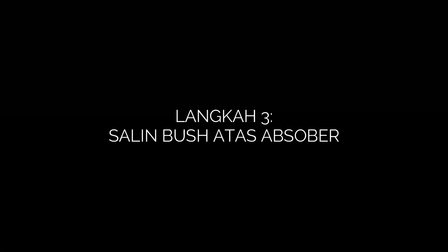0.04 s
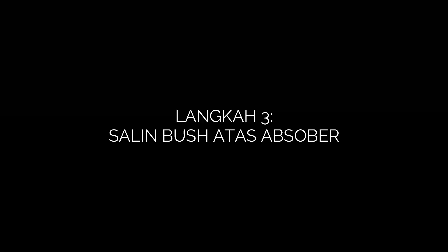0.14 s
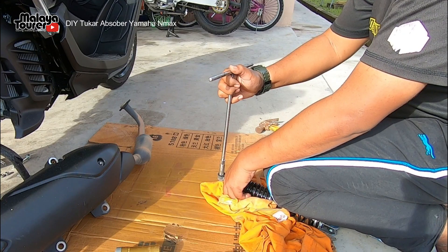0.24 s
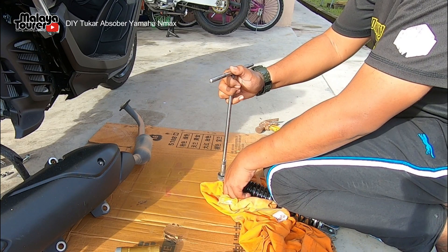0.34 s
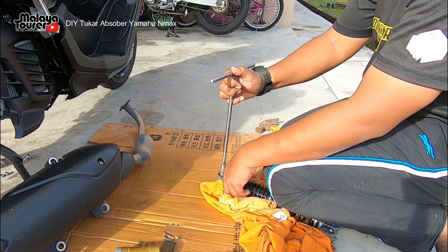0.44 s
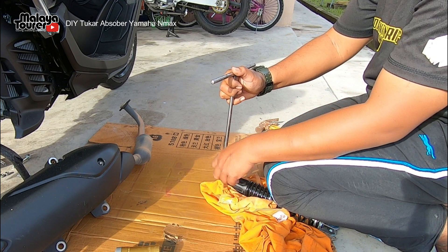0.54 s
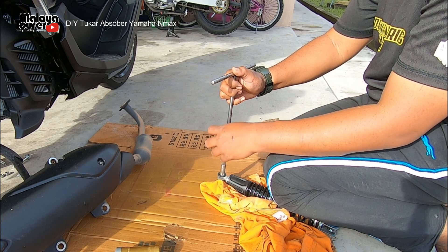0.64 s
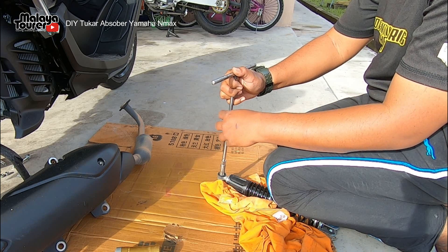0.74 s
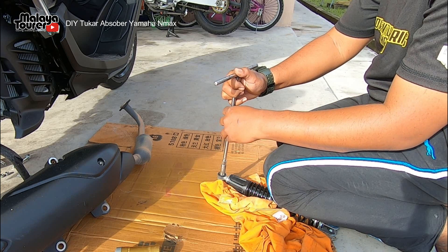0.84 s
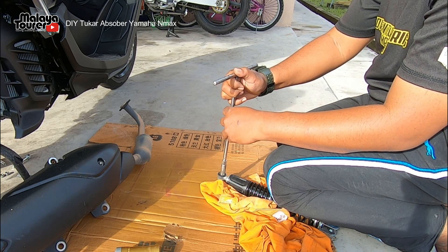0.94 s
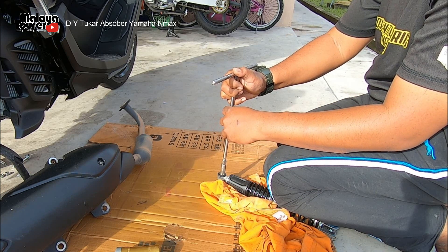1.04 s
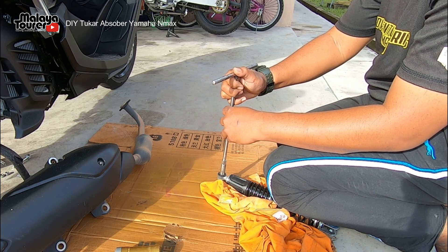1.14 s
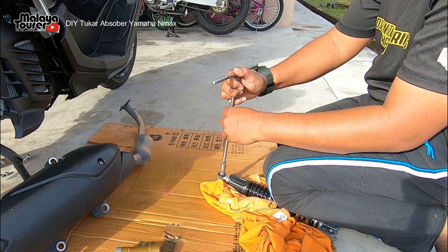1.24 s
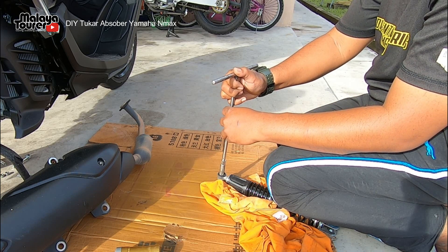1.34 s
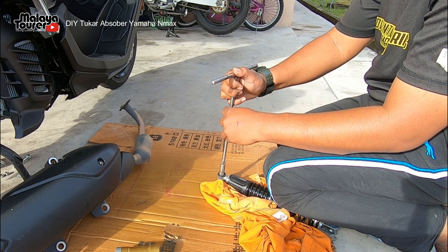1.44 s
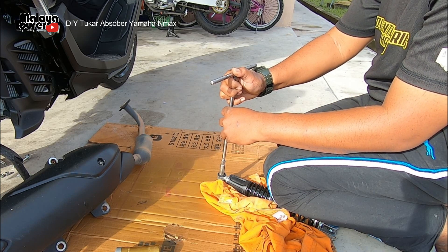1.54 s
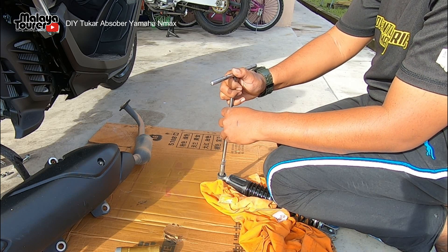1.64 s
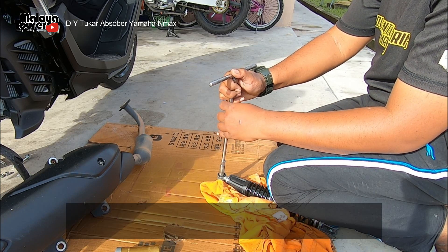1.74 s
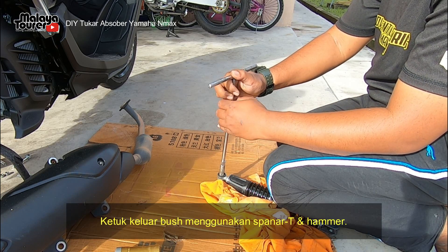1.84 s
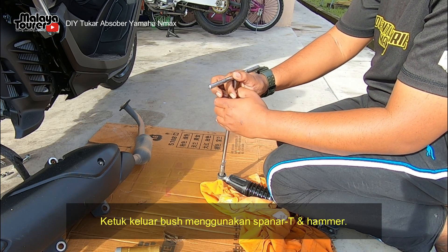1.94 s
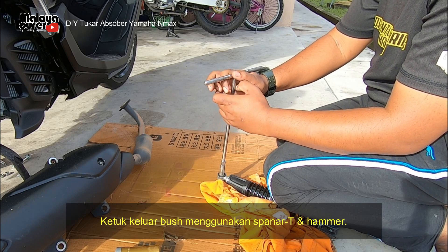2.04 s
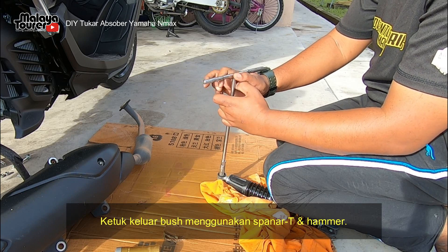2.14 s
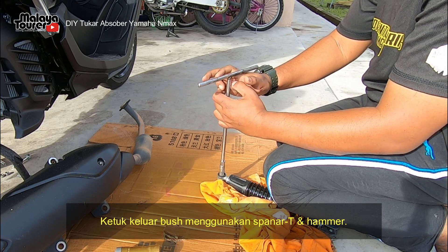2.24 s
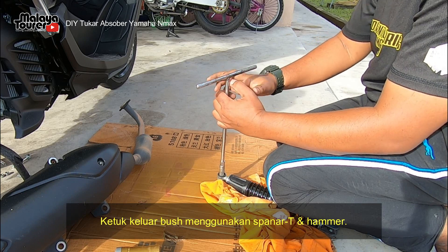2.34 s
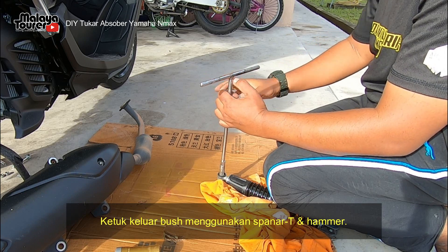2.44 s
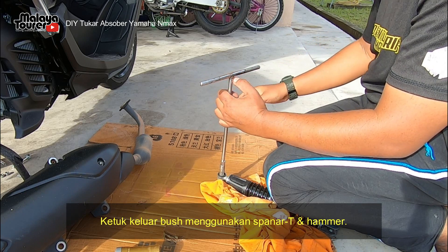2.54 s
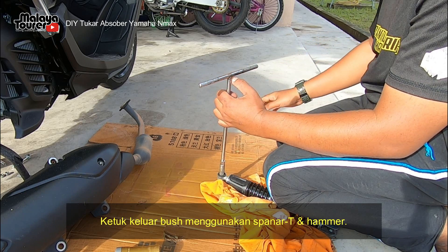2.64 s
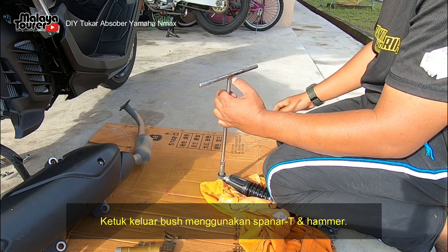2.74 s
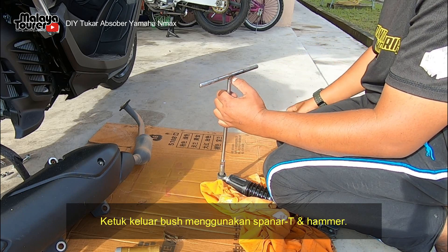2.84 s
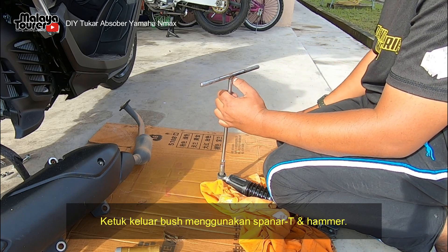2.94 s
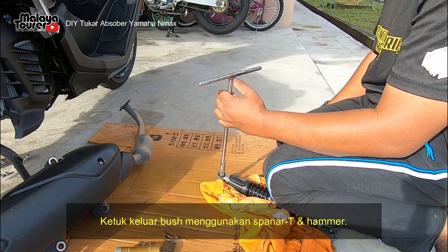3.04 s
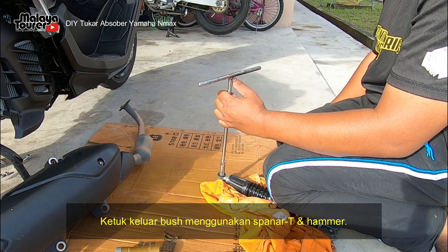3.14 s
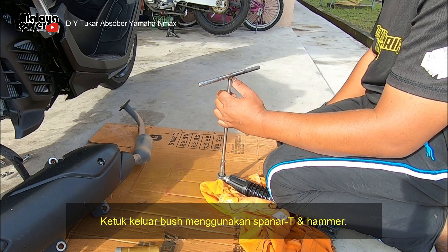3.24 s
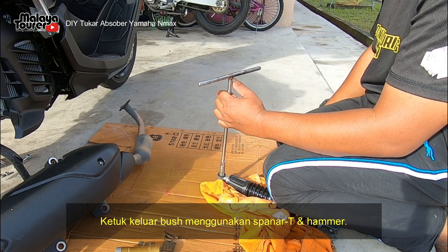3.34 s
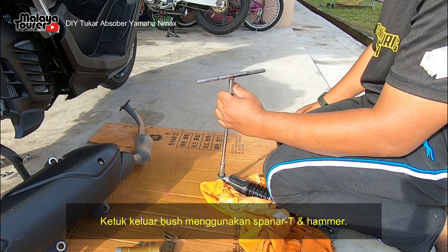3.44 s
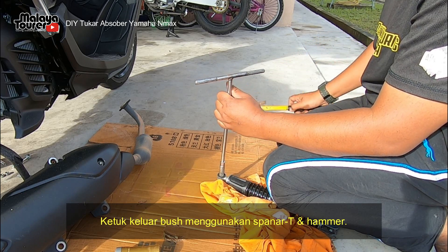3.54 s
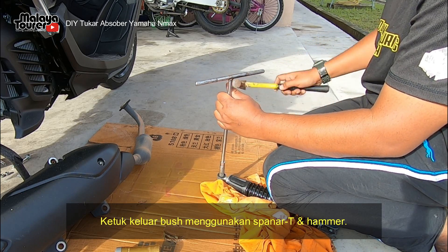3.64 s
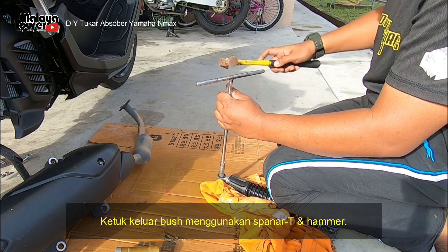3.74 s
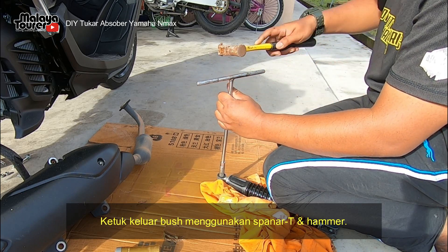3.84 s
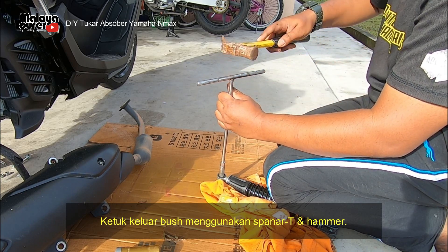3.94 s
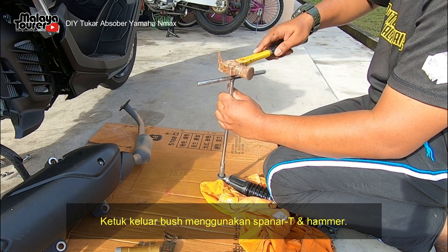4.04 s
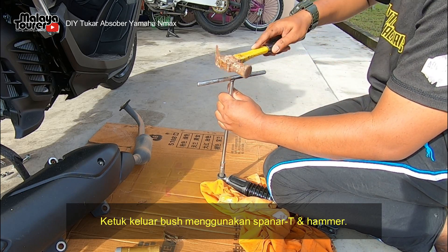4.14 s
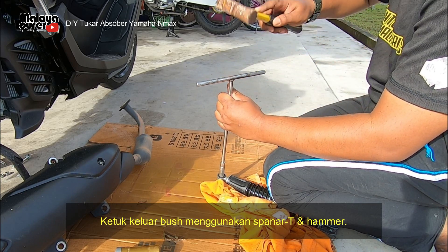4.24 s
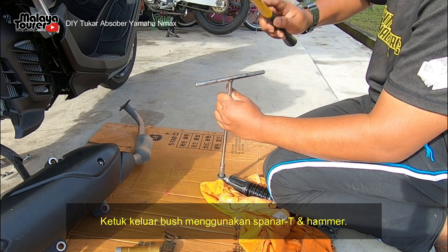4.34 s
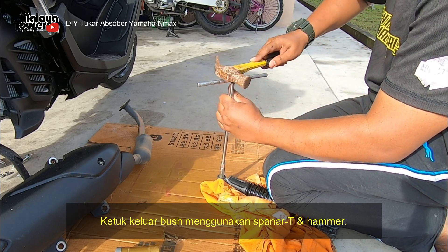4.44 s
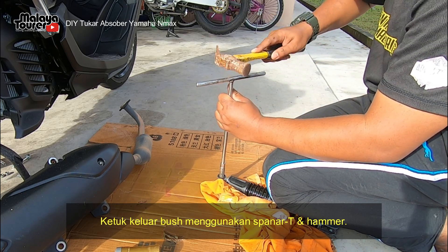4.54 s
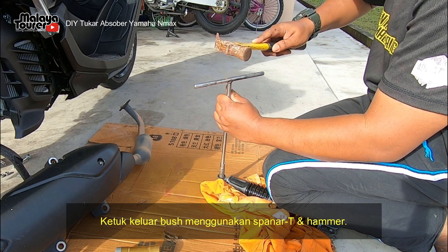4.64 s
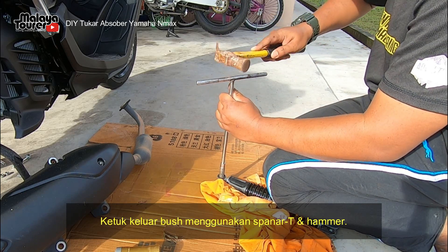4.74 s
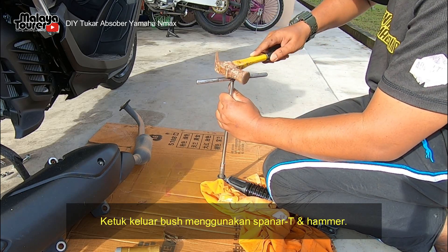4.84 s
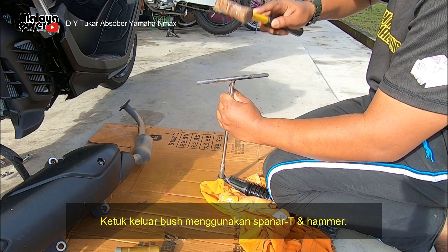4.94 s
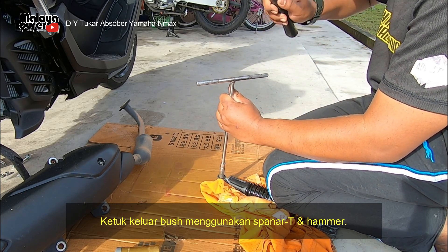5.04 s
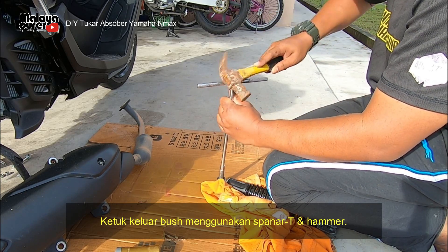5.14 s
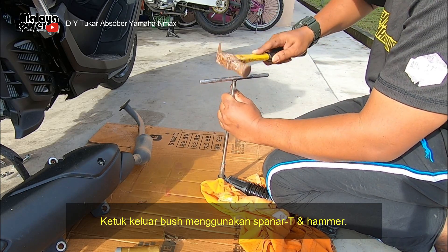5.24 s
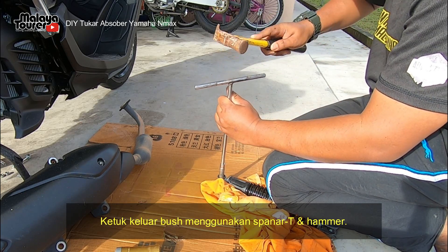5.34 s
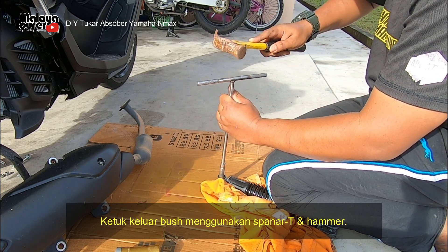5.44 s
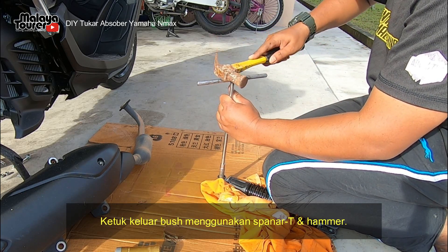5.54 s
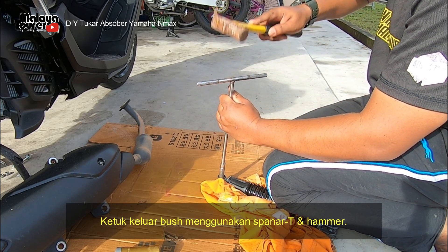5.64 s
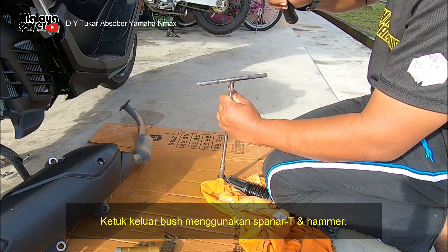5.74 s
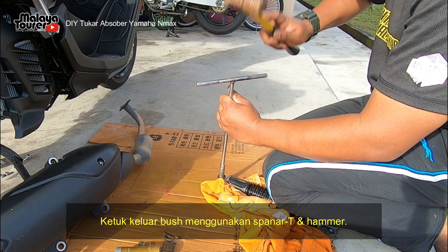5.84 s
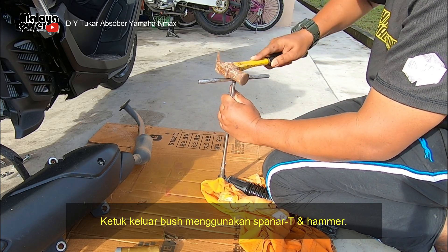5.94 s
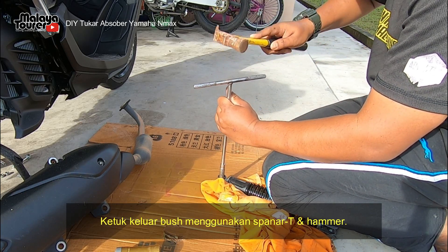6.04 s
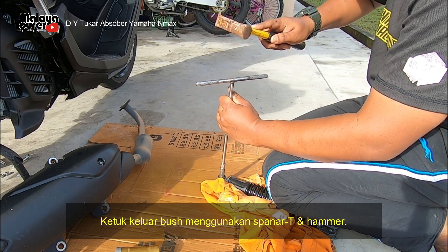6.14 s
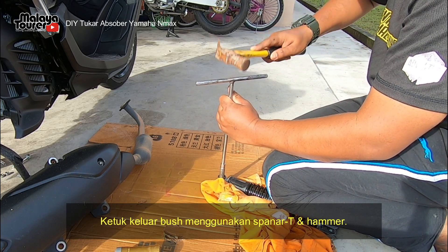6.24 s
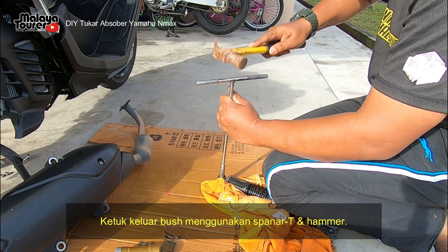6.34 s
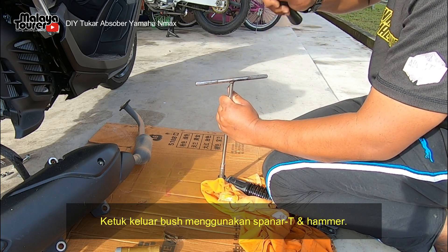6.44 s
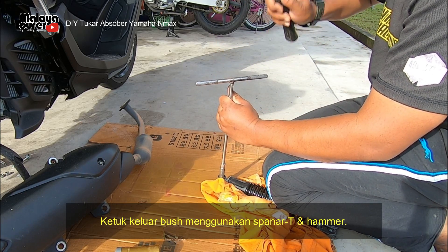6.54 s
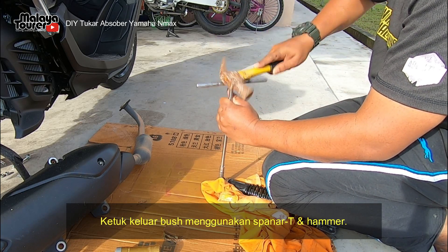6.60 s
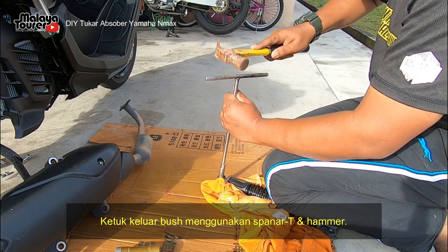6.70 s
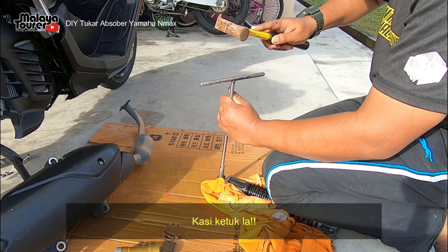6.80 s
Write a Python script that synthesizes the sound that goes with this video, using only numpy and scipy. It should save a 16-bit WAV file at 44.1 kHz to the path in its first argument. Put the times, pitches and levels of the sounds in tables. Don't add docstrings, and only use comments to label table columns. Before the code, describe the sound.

After a quiet outdoor stretch of traffic rumble and insects, a hammer strikes a hand-held steel bar eight times, sharp clanks alternating dull and bright.

```python
import sys
import numpy as np
from scipy import signal
from scipy.fft import rfft, irfft, next_fast_len
from scipy.io import wavfile
from scipy.ndimage import uniform_filter1d

SR = 44100
rng = np.random.default_rng(int(sys.argv[2]) if len(sys.argv) > 2 else 0)


def convert_level_to_amplitude(level_db):
    exponent = np.asarray(level_db, float) / 20
    return 10 ** exponent


def inscribe(sig):
    pcm = np.round(np.clip(np.atleast_2d(sig).T, -1, 1) * 32767)
    wavfile.write(sys.argv[1], SR, pcm.astype(np.int16))


N = 302967

# (time [s], level [dB])
TRAFFIC = [
    (.2, 3),
    (1.1, -1),
    (2.2, -1),
    (3.2, .5),
    (4.2, 1.5),
]
# (frequency [Hz], density [dB per Hz])
RUMBLE_SPECTRUM = [(12, -40), (20, -33), (57, -0.5), (76, 0.5), (119, 0), (145, -4), (182, -0.5),
                   (258, -13), (371, -20.5), (400, -23), (520, -28.5), (880, -120)]
# (frequency [Hz], density [dB per Hz])
AIR_SPECTRUM = [(150, -70), (250, -0.5), (371, -10.5), (404, -10), (569, -10.5), (829, -13), (1270, -18),
                (2090, -20.5), (5100, -28), (6370, -30.5), (7690, -27.5), (8380, -48.5), (9450, -31.5),
                (11800, -53.5), (15000, -52)]
# (frequency [Hz], width [Hz], level over air [dB])
CHORUS = [(6355, 250, -15.5), (9130, 750, -21)]
# (middle [s], length [s], pitch [Hz], level over air [dB])
BOUTS = [
    (.2, .1, 7670, -19),
    (.8, .3, 7600, -18),
    (1.25, .25, 7850, -20),
    (2.25, 0.31, 7650, -13.5),
    (3.48, .4, 7620, -17),
]
# (time [s], start [Hz], end [Hz], length [s], level [dB])
CHIRPS = [
    (0.28, 5700, 6100, .04, -56),
    (1.315, 6000, 5600, .04, -54),
]
# (time [s], frequency [Hz], level [dB], t60 [s])
TICKS = [
    (0.377, 600, -27, .012),
    (.3755, 1240, -35, 0.012),
    (0.35, 950, -31, .008),
    (.3755, 4200, -35, .003),
    (.3755, 3000, -37, .003),
    (3.467, 980, -26, 0.008),
    (3.467, 1700, -30, 0.0054),
    (3.538, 11500, -54, .01),
]
# (time [s], crack [dB], tail [dB], rattle length [s], brightness [units of 2.5 dB per octave])
BLOWS = [
    (4.177, -2, -33, 0.034, -0.3),
    (4.5305, -2, -29.5, 0.15, 1.25),
    (4.905, 1.5, -30, .005, -0.04),
    (5.2494, -2.5, -30, 0.17, 1.27),
    (5.6456, 0.5, -29, .005, 0.19),
    (5.9884, -0.5, -28, 0.17, 1.18),
    (6.3725, -1, -26.5, 0.016, 0.48),
    (6.7068, -5.5, -29.5, .3, 1.52),
]
# (setting [dB], creep [dB per s])
GAIN = [(-6, 13.5), (-11.5, 7), (-4.5, -1.5), (-16.5, 22), (-8, 12.5), (-13, -3.5), (-14, 29.5), (-9, -67)]
# (first [Hz], first [dB], second [Hz], second [dB])
LANDING = [(4040, 6.5, 3330, -9), (3130, 5, 6400, 4), (7800, 6.5, 6100, -3.5), (2630, 3.5, 8200, 5.5),
           (3020, 6, 8600, 7), (3900, 1, 5550, -8), (4140, 5.5, 3570, -7.5), (4550, 1.5, 2600, 4.5)]
# (first [Hz], first [dB], second [Hz], second [dB])
GRIP = [(4250, 4.5, 3900, -1.5), (7750, 4, 5060, 4), (6900, 9, 2700, 7), (12600, 1, 4600, -2),
        (7900, 7.5, 2600, 4), (5050, 1, 14400, 7), (6540, 4, 13500, 0), (3780, 6, 5050, -3)]
# (frequency [Hz], level [dB], t60 [s])
CONTACT = [(983, -23, 0.074), (1346, -10.5, 0.015), (2138, -2.5, 0.012), (2460, -3, 0.011),
           (2637, -2.5, 0.01), (3500, -6, 0.013), (3700, -5.5, 0.036), (4060, -0.5, 0.014),
           (4445, -5.5, 0.0095), (5020, -6, 0.03), (5700, -12.5, 0.038), (6540, -9, 0.013),
           (7740, -18.5, 0.022), (9570, -23.5, 0.019), (11400, -21.5, 0.014), (13200, -25, 0.0055),
           (15300, -39, 0.0058)]
# (frequency [Hz], level [dB], t60 [s])
THUD = [(285, -17, 0.03), (477, -17.5, 0.034), (620, -30, 0.014)]
# (delay [s], level [dB])
ECHOES = [(.0135, -12), (.0175, -13), (.027, -14), (.033, -17), (.043, -17), (.056, -20)]
BAR_HZ = [972, 1160, 2050, 2600, 3490, 3730, 3900, 3970, 4250, 4605, 5020, 5075, 2212, 6490, 7750, 7860,
          9140, 10200, 10850, 11200, 11900, 12450, 12900]
# (width [Hz], level [dB])
BAR_LINES = [(21.9, -12.5), (27, -18), (60, -18.5), (60, -18), (40, -12), (50, -12), (46, -5), (30, -8.5),
             (45, -13.5), (45, -9), (25, -10.5), (30, -10), (30, -18.5), (35, -18.5), (60, -28),
             (50, -24.5), (55, -23), (100, -33.5), (100, -27), (120, -28), (250, -30), (250, -34),
             (250, -34.5)]
# (frequency [Hz], density [dB per Hz])
SCATTER = [(500, -62), (850, -73), (958, -6.5), (1550, -8.5), (3040, -6.5), (3910, -4.5), (5150, -9),
           (6020, -9.5), (7900, -12.5), (8250, -18.5), (10300, -25.5), (11500, -52), (15000, -49)]
# (frequency [Hz], level [dB], phase lead [rad], likeness [0-1])
PORTS = [(40, -10.4, -.2, .94), (130, -11.7, -.2, .96), (215, -15, 0, .92), (260, -16.5, .1, .83),
         (350, -17, 1, .35), (470, -13, 2.5, .7), (690, -6, 2.5, .88), (1000, -1.7, 2.3, .96),
         (1400, -.3, 2, .9), (2400, 0, 1.4, .86), (3450, -1.8, .8, .88), (4130, -5.5, .7, .88),
         (5900, -13.5, .1, .5), (7000, -13, .6, .35), (10000, -4, 0, .35), (14000, -3.5, .2, .7)]

RUMBLE_DB, AIR_DB = -29.5, -43.5
AIR_FOLLOWS_ROAD, AIR_FOLLOWS_GAIN = 0.33, 0.72
BETWEEN_BOUTS_DB = -47
REACT_S, GLIDE_S = 0.016, 0.0064
GROUND_DB, GROUND_RISE_S, GROUND_HARD_DB = -44.5, 0.026, 3.0
RATTLE_FALL_DB_PER_S, LATE_FALL_DB_PER_S = 42.8, 120.3
GROUP_OCTAVES, GRIP_OCTAVES = 0.14, 0.042
HARD_TOP_DB, HARD_LOW_DB = 12.5, -5
SNAP_DB, SNAP_S = -10, .0015
SQUARE_CUT_HZ = 1930
FRONT_DB, FRONT_S = 2, .0018
START_S, CUTOFF_HZ = .2064, 16450


def rms_one(x):
    return x / np.sqrt(np.mean(x ** 2) + 1e-20)


def in_time(rows):
    s, *columns = np.transpose(rows)
    return [np.interp(np.arange(N) / SR, s, c) for c in columns]


def at_hz(rows, hz):
    f, *columns = np.transpose(rows)
    return [np.interp(np.log(hz + 1), np.log(f), c) for c in columns]


def coloured(spectrum, length=N):
    size = next_fast_len(length)
    gain = convert_level_to_amplitude(at_hz(spectrum, np.fft.rfftfreq(size, 1 / SR))[0])
    noise = irfft(gain * rfft(rng.standard_normal((2, size))), size)
    return rms_one(noise[:, :length])


def filtered(x, order, hz, kind="low"):
    return signal.sosfilt(signal.butter(order, hz, kind, fs=SR, output="sos"), x)


def drift(rate_hz):
    r = np.exp(-80 * np.pi * rate_hz / SR)
    slow = signal.lfilter([1], [1, -2 * r, r * r], rng.standard_normal(N // 40 + 2002))[2000:]
    return np.interp(np.arange(N) / 40, np.arange(len(slow)), rms_one(slow))


def ring(clicks, hz, t60_s):
    r, w = convert_level_to_amplitude(-60 / (t60_s * SR)), 2 * np.pi * hz / SR
    return signal.lfilter([0, np.sin(w)], [1, -2 * r * np.cos(w), r * r], clicks + 1e-18)


def narrow_noise(hz, width_hz, size):
    t60_s = np.log(1000) / (np.pi * width_hz)
    return rms_one(ring(rng.standard_normal((2, size)), hz, t60_s))


def burst(shape):
    return rng.standard_normal((2, len(shape))) * shape / np.sqrt(np.sum(shape ** 2))


def hardness(bright, hz):
    return 2.5 * bright * np.maximum(np.log2(hz / 3300), 0)


def colour(groups, octaves, hz):
    first_hz, first_db, second_hz, second_db = groups
    first = np.exp(-.5 * (np.log2(hz / first_hz) / octaves) ** 2)
    second = np.exp(-.5 * (np.log2(hz / second_hz) / octaves) ** 2)
    return first_db * first + second_db * second


def gain_control():
    t, gain_db = np.arange(N) / SR, np.zeros(N)
    for (s, *_), (setting_db, creep_db_per_s) in zip(BLOWS, GAIN):
        since_s = t - s - REACT_S
        gain_db = np.where(since_s > 0, setting_db + creep_db_per_s * since_s, gain_db)
    r = np.exp(-1 / (GLIDE_S * SR))
    return signal.lfilter([1 - r], [1, -r], gain_db)


def rumble(road_db, gain_db):
    gusts_db = 1.6 * drift(12)
    return convert_level_to_amplitude(RUMBLE_DB + road_db + gain_db + gusts_db) * coloured(RUMBLE_SPECTRUM)


def swells(low_hz=700, high_hz=2600):
    hiss = filtered(rng.standard_normal((2, N)), 2, [low_hz, high_hz], "band")
    return convert_level_to_amplitude(-17.0 + 2.9 * drift(2.3)) * rms_one(hiss)


def insects():
    chorus = sum(convert_level_to_amplitude(db + 1.4 * drift(5.1)) * narrow_noise(hz, width_hz, N) for hz, width_hz, db in CHORUS)
    t = np.arange(N) / SR
    pitch_hz, = in_time([(s, hz) for s, length_s, hz, db in BOUTS])
    swell = convert_level_to_amplitude(BETWEEN_BOUTS_DB)
    for s, length_s, hz, db in BOUTS:
        swell = swell + convert_level_to_amplitude(db) * np.exp(-(2 * (t - s) / length_s) ** 2)
    slow = filtered(rng.standard_normal((2, 2, N)), 2, 160)
    phase = 2 * np.pi * np.cumsum(pitch_hz) / SR
    singer = rms_one(slow[0] * np.cos(phase) + slow[1] * np.sin(phase))
    return chorus + swell * singer


def air(road_db, gain_db):
    level_db = AIR_DB + AIR_FOLLOWS_ROAD * road_db + AIR_FOLLOWS_GAIN * gain_db
    hiss = convert_level_to_amplitude(0.95 * drift(20.0)) * coloured(AIR_SPECTRUM)
    return convert_level_to_amplitude(level_db) * (hiss + insects() + swells())


def small_sounds():
    out = np.zeros(N)
    for s, from_hz, to_hz, length_s, db in CHIRPS:
        size, at = round(length_s * SR), round(s * SR)
        phase = 2 * np.pi * np.cumsum(np.linspace(from_hz, to_hz, size)) / SR
        out[at:at + size] += convert_level_to_amplitude(db) * np.hanning(size) * np.sin(phase)
    for s, hz, db, t60_s in TICKS:
        at = round(s * SR)
        out[at:at + 2000] += convert_level_to_amplitude(db) * ring(np.arange(2000) == 0, hz, t60_s)
    return out


def ground(low_hz=220, high_hz=480):
    t, shape = np.arange(N) / SR, 0
    for s, crack_db, tail_db, rattle_s, bright in BLOWS:
        since = np.maximum(t - s, 0) / GROUND_RISE_S
        level_db = GROUND_DB + crack_db + GROUND_HARD_DB * bright
        shape = shape + convert_level_to_amplitude(level_db) * since * np.exp(1 - since)
    return shape * rms_one(filtered(rng.standard_normal((2, N)), 2, [low_hz, high_hz], "band"))


def tails(scatter_db=-2.0, wash_fall_db_per_s=1.5, onset_s=0.0034, rattle_db=1.0):
    out, span = np.zeros((2, N)), round(.5 * SR)
    t, all_hz = np.arange(span) / SR, np.fft.rfftfreq(span, 1 / SR) + 1
    for (s, crack_db, tail_db, rattle_s, bright), grip in zip(BLOWS, GRIP):
        at = round(s * SR)
        lines = np.zeros((2, span))
        for hz, (width_hz, db) in zip(BAR_HZ, BAR_LINES):
            line = narrow_noise(hz * rng.normal(1, 0.0037), width_hz, span)
            lines += convert_level_to_amplitude(db + rng.normal(0, 1.94)) * line
        wash = convert_level_to_amplitude(scatter_db - wash_fall_db_per_s * t) * coloured(SCATTER, span)
        held_db = RATTLE_FALL_DB_PER_S * np.minimum(t, rattle_s)
        dying_db = LATE_FALL_DB_PER_S * np.maximum(t - rattle_s, 0)
        shape = convert_level_to_amplitude(tail_db - held_db - dying_db) * (1 - np.exp(-(t / onset_s) ** 2))
        tone_db = hardness(bright, np.minimum(all_hz, 8500)) + colour(grip, GRIP_OCTAVES, all_hz)
        tone_db += HARD_LOW_DB * bright * np.clip(np.log2(2000 / all_hz), 0, 1)
        tail = irfft(rfft(lines + wash) * convert_level_to_amplitude(tone_db), span) * shape
        out[:, at:at + span] += tail[:, :N - at]
    return out * convert_level_to_amplitude(rattle_db * drift(61))


def cracks(contact_s=0.001, trim_db=-8, duck_db=6.0, lead_in_db=-27):
    out, span, lead = np.zeros((2, N)), round(.13 * SR), round(.011 * SR)
    t = (np.arange(span) - lead) / SR
    after = np.maximum(t, 0)
    for (s, crack_db, tail_db, rattle_s, bright), landing in zip(BLOWS, LANDING):
        impulse = (t == 0) * np.array([[1], [0]])
        scuff = burst(after * np.exp(-after / contact_s))
        force = impulse + np.array([[.4], [1]]) * scuff
        force += convert_level_to_amplitude(lead_in_db + 3.9 * bright) * burst(1. * (t < 0))
        for delay_s, echo_db in ECHOES:
            later = np.maximum(t - delay_s, 0)
            blur = later * np.exp(-later / (contact_s + 0.0047 * delay_s))
            force += convert_level_to_amplitude(echo_db - duck_db * bright) * burst(blur)
        square = bright > .5
        body = np.zeros((2, span))
        for k, (hz, db, t60_s) in enumerate(CONTACT):
            sign = -1 if square else (-1) ** k
            mode_db = db + hardness(bright, hz) + colour(landing, GROUP_OCTAVES, hz)
            mode_db += HARD_TOP_DB * (bright - 1.5) * np.clip(np.log2(hz / 8000), 0, 1)
            body += sign * convert_level_to_amplitude(mode_db) * ring(force, hz, t60_s)
        soft_hz = np.clip(11000 * 2 ** (0.98 * bright), 3000, 19000)
        body = filtered(body, 2, soft_hz)
        snap = filtered(burst((t >= 0) * np.exp(-after / SNAP_S)), 4, [4500, 14300], "band")
        body += convert_level_to_amplitude(SNAP_DB + 13.0 * bright) * snap
        if square:
            body = filtered(body, 2, SQUARE_CUT_HZ, "high")
        body *= convert_level_to_amplitude(FRONT_DB * max(bright, 0) * np.exp(-after / FRONT_S) * (t >= 0))
        thud = sum(convert_level_to_amplitude(db + 1.3 * bright) * ring(t == 0, hz, t60_s) for hz, db, t60_s in THUD)
        at = round(s * SR) - lead
        out[:, at:at + span] += convert_level_to_amplitude(crack_db + trim_db) * (filtered(body, 2, 800, "high") + thud)
    return out


def scene():
    (road_db,), gain_db = in_time(TRAFFIC), gain_control()
    background = rumble(road_db, gain_db) + air(road_db, gain_db) + small_sounds()
    return background + ground() + tails() + cracks()


def ports(dry):
    size = next_fast_len(N + 4096)
    level_db, lead_rad, alike = at_hz(PORTS, np.fft.rfftfreq(size, 1 / SR))
    alike = np.clip(alike, 0, 1)
    first, second = rfft(dry, size)
    left, apart = convert_level_to_amplitude(level_db) * np.exp(1j * lead_rad), np.sqrt(1 - alike ** 2)
    even = 2 / np.sqrt(abs(1 + alike * left) ** 2 + abs(apart * left) ** 2)
    return irfft(even * np.array([left * (alike * first + apart * second), first]), size)[:, :N]


def limiter(pair):
    return np.tanh(abs(pair) ** 6) ** (1 / 6) * np.sign(pair)


def coarse_top(pair, from_hz=9900, mask_db=-14, slope_db_per_khz=-3.0):
    hz, _, frames = signal.stft(pair, SR, nperseg=1024)
    power = uniform_filter1d(abs(frames) ** 2, size=5, axis=1)
    over_db = mask_db + slope_db_per_khz * (hz[:, None] - from_hz) / 1000
    middle = power[:, (hz > 2000) & (hz < 9000)].mean(axis=(0, 1))
    steady = middle < 8.0 * np.roll(middle, 2)
    mask = steady * middle * convert_level_to_amplitude(over_db) ** 2
    frames[(hz[:, None] > from_hz) & (power < mask)] *= .03
    return signal.istft(frames, SR, nperseg=1024)[1][:, :N]


def top_cut(x):
    return signal.sosfilt(signal.butter(12, 16460, fs=SR, output="sos"), x)


def record(dry):
    pair = coarse_top(limiter(ports(dry)))
    pair = pair * np.clip((np.arange(N) / SR - START_S) / .001, 0, 1)
    mix = signal.sosfilt(signal.cheby2(10, 60, CUTOFF_HZ, fs=SR, output="sos"), .97 * pair)
    return top_cut(mix)


dry = scene()
out = record(dry)
inscribe(out)
```